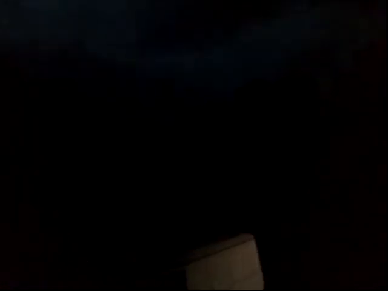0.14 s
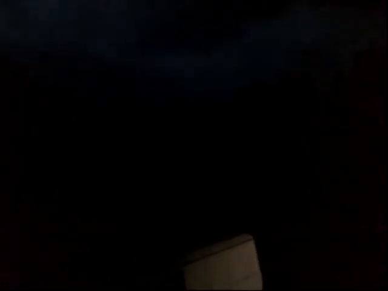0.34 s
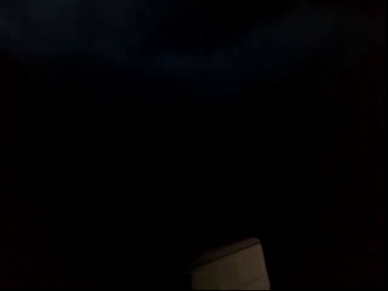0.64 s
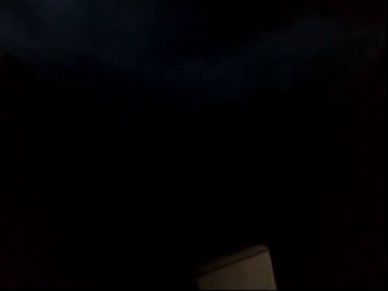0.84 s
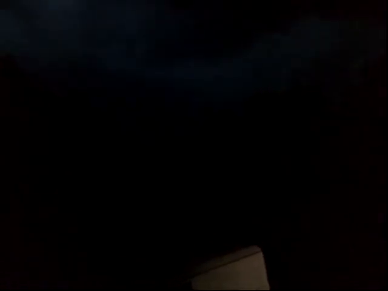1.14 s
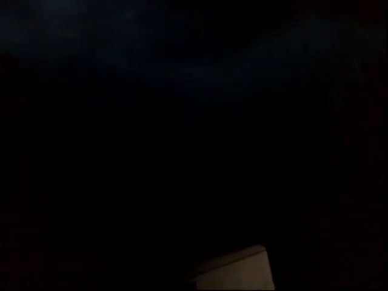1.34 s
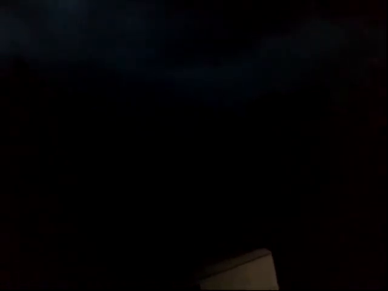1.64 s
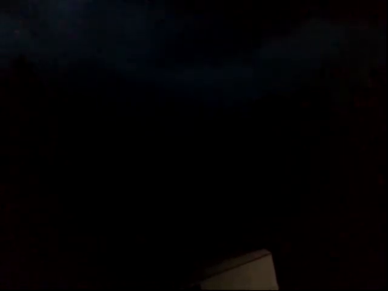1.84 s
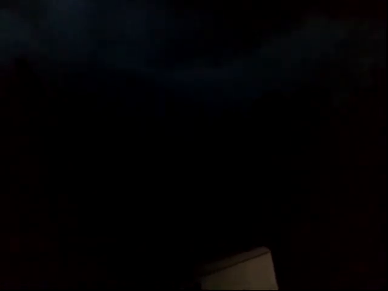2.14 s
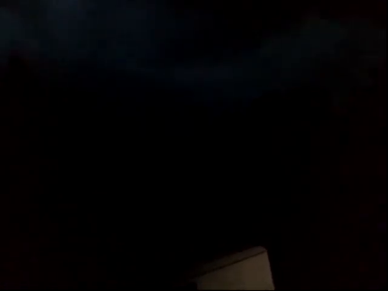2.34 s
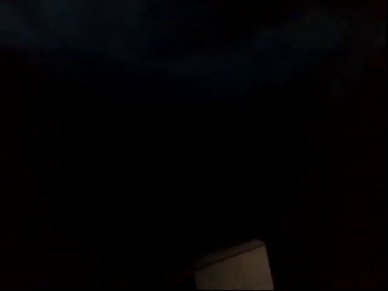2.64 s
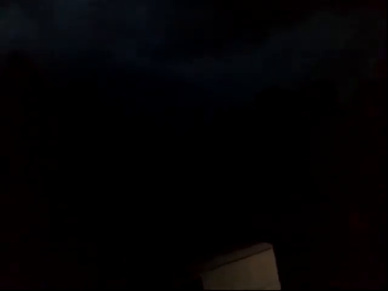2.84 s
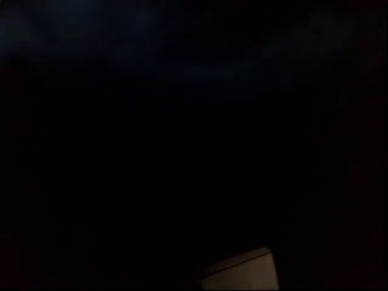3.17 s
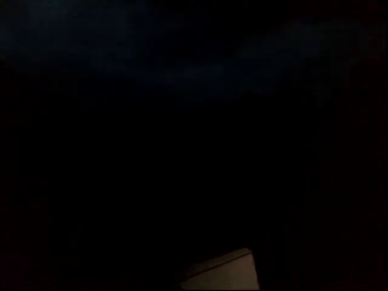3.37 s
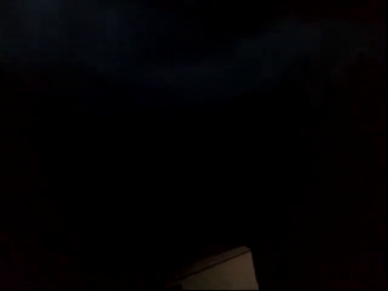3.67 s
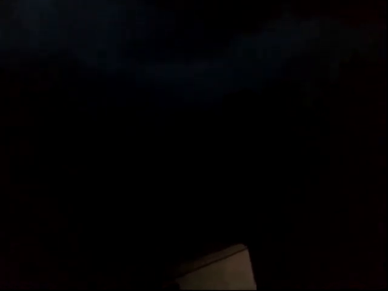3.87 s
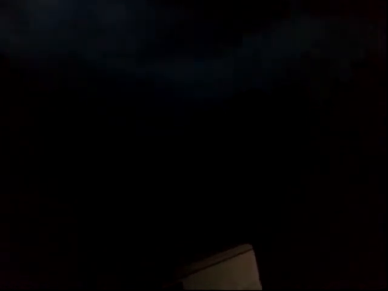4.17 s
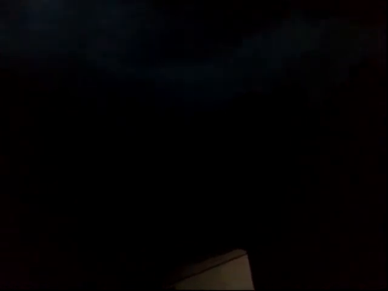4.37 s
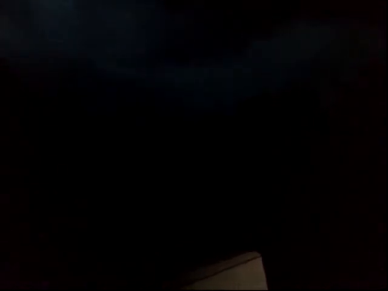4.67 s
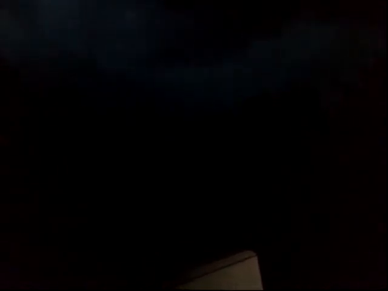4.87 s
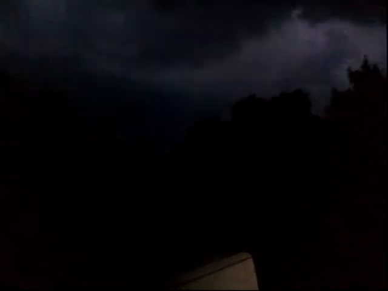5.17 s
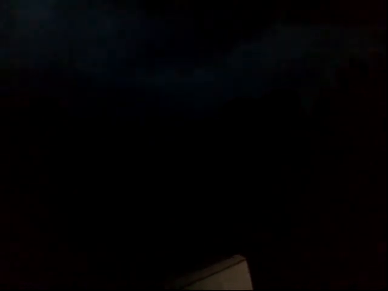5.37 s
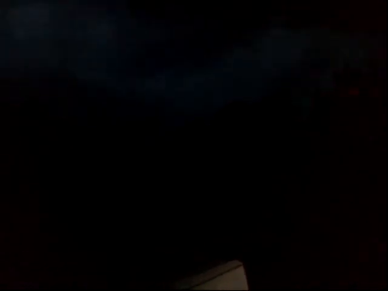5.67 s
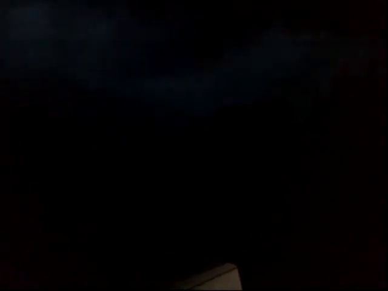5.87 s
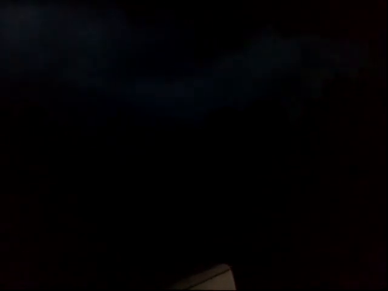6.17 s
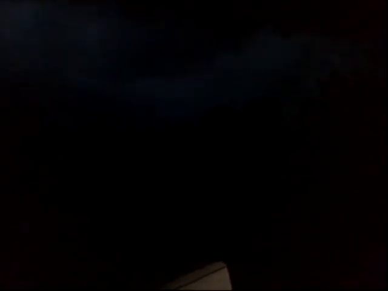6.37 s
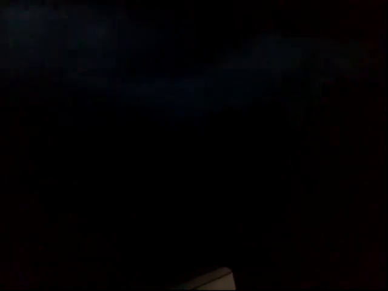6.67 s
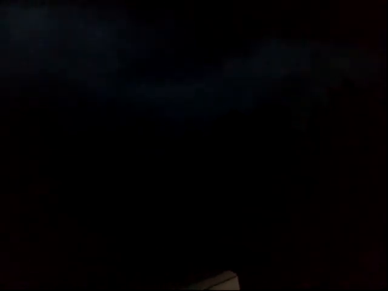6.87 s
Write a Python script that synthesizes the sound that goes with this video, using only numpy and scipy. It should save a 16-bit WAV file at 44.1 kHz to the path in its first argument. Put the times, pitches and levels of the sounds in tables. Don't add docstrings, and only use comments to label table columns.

```python
import sys
import numpy as np
from scipy import signal
from scipy.fft import rfft, irfft
from scipy.io import wavfile
from scipy.ndimage import uniform_filter1d

SR = 44100
rng = np.random.default_rng(int(sys.argv[2]) if len(sys.argv) > 2 else 0)


def invert_db(x):
    u = np.asarray(x, float) / 20
    return 10 ** u


def file_out(sig):
    cols = np.atleast_2d(sig).T
    lim = np.clip(cols, -1, 1)
    pcm = np.round(lim * 32767).astype(np.int16)
    wavfile.write(sys.argv[1], SR, pcm)


N = 309141

# frequency in Hz, level in dB per Hz.
WATER_HISS = [(120, -19.5), (220, -4.5), (330, -8.5), (600, -4.5), (1600, -5.5), (2000, -3), (2260, -2),
              (2500, -4), (2900, -7.5), (3400, -7.5), (3650, -6), (5400, -5.5), (6400, -0.5), (8450, -4)]
# start in seconds, length in seconds, small lumps in dB, deep shake in dB.
LUMP_ROLLS = [
    (0.0, .37, -23, -36.5),
    (2.54, 0.16, -29.5, -38),
    (2.681, .28, -30.5, -39),
    (2.949, 0.28, -25.5, -33.5),
    (3.263, 0.17, -24, -34),
]
ROLL_ENDS_DB = -11


def evened(x):
    return x / np.sqrt(np.mean(x ** 2) + 1e-20)


def curve(rows, column):
    rows = np.array(rows)
    return np.interp(np.arange(N) / SR, rows[:, 0], rows[:, column])


def colour(x, points):
    f, db = np.transpose(points)
    hz = np.fft.rfftfreq(len(x), 1 / SR)
    gain_db = np.interp(np.log(hz + 1), np.log(f + 1), db, right=-120)
    return irfft(rfft(x) * invert_db(gain_db), len(x))


def add(mix, start_s, sound):
    part = mix[round(start_s * SR):][:len(sound)]
    part += sound[:len(part)]


def motor():
    # frequency in Hz, level in dB rms.
    motor_tones = [(96.9, -60.5), (193.8, -55.5), (296.1, -61)]
    # time in seconds, level in dB.
    motor_swell = [
        (4.0, -21),
        (4.5, 3),
        (5.8, 1),
        (6.3, -18),
    ]
    speed = 1 + 0.019 * evened(uniform_filter1d(rng.standard_normal(N), size=9000))
    wavering_s = np.cumsum(speed) / SR
    tones = sum(invert_db(db - 3.5) * np.sin(2 * np.pi * hz * wavering_s) for hz, db in motor_tones)
    return invert_db(curve(motor_swell, column=1)) * tones


def swell(place):
    return ROLL_ENDS_DB * (2 * place - 1) ** 2


def rumble():
    # frequency in Hz, level in dB per Hz.
    rumble_spectrum = [(8.8, -25), (15, -11), (43, -3), (80, -2.5), (107, -1), (140, -0.5), (219, -8.5),
                       (300, -8), (390, -40), (660, -120)]
    # frequency in Hz, level in dB per Hz.
    shake_spectrum = [(12, -29), (25, -9), (55, -5), (95, -3.5), (150, -15.5), (260, -37)]
    # time in seconds, level in dB.
    rumble_level = [(0, -54.5), (0.95, -51), (1.15, -57.5), (1.6, -51.5), (2.4, -53.5), (3.8, -53),
                    (4.6, -51.5), (4.95, -57.5), (7.01, -55)]
    tail_start_db, tail_t60_s = -9, 1.1
    t, shake_power = np.arange(N) / SR, np.zeros(N)
    for start_s, length_s, _, shake_db in LUMP_ROLLS:
        after_s = t - start_s - length_s
        during_db = 2 * swell(np.clip((t - start_s) / length_s, 0, 1))
        dying_db = 2 * ROLL_ENDS_DB - 60 * after_s / tail_t60_s
        level_db = np.where(after_s < 0, during_db, dying_db)
        tail_db = tail_start_db - 60 * abs(after_s) / tail_t60_s
        shake_power += (t > start_s) * (invert_db(shake_db + level_db) ** 2 + invert_db(shake_db + tail_db) ** 2)
    lumpy = invert_db(1.6 * evened(uniform_filter1d(rng.standard_normal(N), size=1500)))
    bed = evened(lumpy * colour(rng.standard_normal(N), rumble_spectrum))
    shake = evened(lumpy * colour(rng.standard_normal(N), shake_spectrum))
    shake_level = uniform_filter1d(np.sqrt(shake_power), size=800)
    return invert_db(curve(rumble_level, column=1)) * bed + shake_level * shake


def lump(peak_db, hz, width_ms, phase_turns):
    t = np.arange(-2205, 2205) / SR
    outline = np.exp(-(t / (0.00045 * np.clip(width_ms, 3, 40))) ** 2)
    turns = hz * (t - 5.2 * t * abs(t)) + phase_turns
    crest = 0.24 * np.cos(4 * np.pi * turns + 1.58) * outline
    return invert_db(peak_db) * (np.cos(2 * np.pi * turns) + crest) * outline, outline


def small_lumps():
    gap_s, spread_db, flutter_db = .012, 3, -23.5
    low_hz, high_hz, short_ms, long_ms = 71, 185, 5.6, 13.2
    rows = []
    for start_s, length_s, roll_db, _ in LUMP_ROLLS:
        gap, pitch, width, luck = rng.random((60, 4)).T
        s = np.cumsum(gap_s * (.5 + gap))
        level_db = roll_db + swell(s / length_s) + spread_db * 2 * (2 * luck - 1)
        hz = low_hz * (high_hz / low_hz) ** pitch
        width_ms = short_ms + (long_ms - short_ms) * width
        found = np.transpose([start_s + s, level_db, hz, width_ms, flutter_db + 0 * s])
        rows += list(found[s < length_s])
    return rows


def thumps():
    # time in seconds, peak in dB, frequency in Hz, width in ms,
    # flutter in dB under the peak.
    strong_claps = [(0.034, -27.5, 110, 20, -29), (0.096, -18.5, 130, 5.1, -19), (0.121, -16.5, 159, 7, -21),
                    (0.138, -13, 124, 20, -19), (0.149, -17, 168, 5.2, -18), (0.175, -28, 110, 8.8, -26),
                    (0.199, -13, 244, 11, -13), (0.224, -22, 234, 6.3, -8), (0.255, -16, 222, 20, -4.5),
                    (0.274, -17, 165, 14.4, -23), (0.291, -22, 203, 12, -8), (0.31, -14, 140, 4.3, -10.5),
                    (0.358, -27, 99, 13, -17),
                    (2.55, -37, 100, 13, -18), (2.592, -24, 180, 7.3, -20), (2.613, -12.5, 120, 8, -10),
                    (2.62, -27, 330, 5.5, -8), (2.633, -19.5, 215, 10, -8), (2.672, -29, 95, 9, -17),
                    (2.728, -21, 134, 7, -22), (2.784, -19, 109, 3.8, -22), (2.933, -26, 180, 6, -24),
                    (2.976, -15, 175, 5.4, -32), (2.964, -23, 75, 18, -32), (3.006, -19.5, 150, 8.4, -4),
                    (3.029, -18, 140, 5.1, -12), (3.074, -19.5, 171, 10.4, -13),
                    (3.117, -20.5, 145, 11.4, -18), (3.157, -22.5, 140, 4.2, -27),
                    (3.208, -22, 162, 3.6, -14), (3.306, -24, 85, 9.9, -7), (3.329, -7.5, 175, 4.3, -13),
                    (3.335, -16, 100, 9.7, -23), (3.366, -16, 190.6, 8, -15.5), (3.384, -22.5, 85, 14, -24)]
    # time in seconds, peak in dB, frequency in Hz, width in
    # ms.
    faint_lumps = [(0.469, -43, 305, 23), (0.66, -42, 140, 20), (0.895, -35, 167, 7.3),
                   (1.05, -43, 60.22, 25), (3.559, -36.5, 142, 19), (3.75, -44, 55, 30),
                   (4.191, -44, 223, 9), (4.442, -37, 260, 6.7), (4.469, -39, 201, 23),
                   (4.708, -39.5, 240, 14), (4.728, -44.5, 343, 14), (5.14, -39, 230, 9),
                   (5.31, -40, 101, 21), (5.768, -46, 215, 24), (5.788, -46, 105, 31), (6.11, -43, 543, 32)]
    # frequency in Hz, level in dB per Hz.
    flutter_spectrum = [(200, -24), (330, 1), (500, -8.5), (770, -14.5), (1000, -36)]
    out, ragged = np.zeros(N + 4410), np.zeros(N + 4410)
    claps = [*strong_claps, *small_lumps()]
    for (s, db, hz, ms, under_db), phase_turns in zip(claps, rng.random(400)):
        wave, outline = lump(db, hz, ms, phase_turns)
        add(out, s, wave)
        add(ragged, s, invert_db(db + under_db) * uniform_filter1d(outline, size=200))
    for (s, db, hz, ms), phase_turns in zip(faint_lumps, rng.random(len(faint_lumps))):
        add(out, s, lump(db, hz, ms, phase_turns)[0])
    flutter = evened(colour(rng.standard_normal(N), flutter_spectrum))
    centred = slice(2205, 2205 + N)
    pressure = out[centred] + invert_db(-7.0) * ragged[centred] * flutter
    return signal.lfilter(*signal.butter(2, 32, "high", fs=SR), pressure)


def ticks():
    # time in seconds, peak in dB, ring in Hz, t60 in seconds.
    near_drops = [(0.2997, -19, 6690, 0.016), (0.7594, -23, 5730, 0.025), (1.17, -22, 7100, 0.014),
                  (1.5998, -20.5, 6860, 0.035), (2.3291, -22.5, 6040, 0.015), (2.4286, -28.5, 6000, 0.019),
                  (3.3263, -20, 6460, 0.014), (3.4376, -20.5, 6430, 0.02), (3.4945, -18, 6200, 0.013),
                  (3.6317, -41, 6260, 0.023), (4.7975, -31, 6230, 0.023), (5.128, -22.5, 3800, 0.028),
                  (4.142, -24, 5580, 0.033), (6.095, -16, 3590, 0.018), (6.213, -34, 6260, 0.02)]
    out, t = np.zeros(N), np.arange(2000) / SR
    for (s, db, hz, t60_s), noise in zip(near_drops, rng.standard_normal((len(near_drops), 2000))):
        ring = np.sin(2 * np.pi * hz * t) + 0.29 * np.sin(2 * np.pi * 0.54 * hz * t)
        bright_noise = evened(np.diff(uniform_filter1d(noise, size=3), prepend=0))
        snap = 0.88 * bright_noise * np.exp(-t / 0.0032)
        rise = np.minimum(t / 0.0009, 1)
        add(out, s, invert_db(db - 6.5) * rise * (ring * invert_db(-60 * t / t60_s) + snap))
    return out


def splashes():
    # time in seconds, peak in dB, centre in octaves above 1 kHz, spread in octaves, hold in ms.
    water_bursts = [(.625, -25, 3.1, 1.9, 27), (1.214, -25.5, 2.5, 1.2, 14), (1.67, -26, 2, 2.1, 14),
                    (3.197, -24, 3.3, 1.6, 26), (3.292, -18.5, 1.5, 0.54, 25), (3.291, -20.5, 0.8, 2.1, 36),
                    (3.902, -26, 1.7, 1.2, 16), (4.121, -28.5, 2.2, 1.4, 53), (4.68, -29.5, 2.8, 1.2, 26),
                    (5.126, -26.5, 0.48, 2.4, 75), (5.72, -28.5, 0.9, 2.1, 40), (6.51, -29, 2.2, 1.8, 60),
                    (6.799, -29.5, 2.25, 0.32, 15), (6.095, -31, 0.8, 1.4, 5), (6.1, -38.5, 0.1, 0.76, 50),
                    (6.958, -28.5, 1.8, 0.92, 21)]
    rise_s, spray_t60_s = .004, 0.16
    longer_s_per_db, big_db = 0.25, -19
    out, t = np.zeros(N), np.arange(SR // 3) / SR
    f = np.geomspace(150, 12000, num=30)
    for s, db, centre, octaves, hold_ms in water_bursts:
        t60_s = spray_t60_s + longer_s_per_db * max(db - big_db, 0)
        hump = np.transpose([f, -6 * ((np.log2(f / 1000) - centre) / octaves) ** 2])
        spray = evened(colour(colour(rng.standard_normal(len(t)), hump), WATER_HISS))
        droplets = evened(uniform_filter1d(rng.standard_normal(len(t)), size=90))
        spray *= invert_db(2.0 * droplets)
        fade = invert_db(-60 * np.maximum(t - hold_ms / 1000, 0) / t60_s)
        add(out, s, invert_db(db - 11.5) * spray * np.minimum(t / rise_s, 1) * fade)
    return out


def patchy(patch_db, flicker_db):
    a, b, patches, flicker = rng.standard_normal((N // 64 + 5, 129, 4)).T
    patches = evened(uniform_filter1d(uniform_filter1d(patches, size=4, axis=0), size=40, axis=1))
    flicker = evened(uniform_filter1d(uniform_filter1d(flicker, size=50, axis=0), size=14, axis=1))
    z = (a + 1j * b) * invert_db(patch_db * patches + flicker_db * flicker)
    return evened(signal.istft(z, nperseg=256, noverlap=192)[1][:N])


def drops(per_s, spread_db):
    landing = invert_db(spread_db * np.minimum(rng.exponential(1, N), 5)) * (rng.random(N) < per_s / SR)
    kind, t, out = rng.integers(0, 24, N), np.arange(600) / SR, np.zeros(N)
    for k, hz in enumerate(np.linspace(1300, 8200, num=24)):
        ring = np.sin(2 * np.pi * hz * t) * np.exp(-t / 0.001)
        out += signal.oaconvolve(landing * (kind == k), ring)[:N]
    return evened(out)


def rain():
    # time in seconds, level in dB.
    rainfall = [(0, -39.5), (1.2, -39.5), (2.2, -40.5), (2.7, -39), (3.5, -39.5), (4.5, -38.5),
                (5.5, -38.5), (6.5, -39.5), (7.01, -39.5)]
    mix = patchy(patch_db=0.63, flicker_db=0.75) + invert_db(-11) * drops(per_s=1500, spread_db=2.0)
    return invert_db(curve(rainfall, column=1) + 0.93) * evened(colour(mix, WATER_HISS))


def scene():
    return (motor() + rumble() + thumps() + ticks() + splashes() + rain())[None]


def band_limit(x):
    return signal.sosfilt(signal.butter(12, 9110, fs=SR, output="sos"), x)


def record(dry):
    # frequency in Hz, level in dB.
    mic_top = [(6700, 0), (7000, -2), (7500, -6.5), (8050, -17.5), (8450, -25)]
    # distance past the fold in Hz, level in dB.
    mirror_image = [(0, 5), (200, -7), (500, -15), (900, -31.5), (1300, -51)]
    fold_hz = 8000
    z, fold = rfft(colour(dry[0], mic_top)[None]), round(fold_hz * N / SR)
    past = np.arange(1, fold // 4)
    mirror_db = np.interp(past * SR / N, *np.transpose(mirror_image))
    z[:, fold + 1:] = 0
    z[:, fold + past] = np.conj(z[:, fold - past]) * invert_db(mirror_db)
    return band_limit(irfft(z, N))


dry = scene()
out = record(dry)
file_out(out)
```